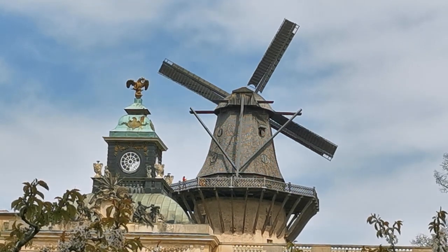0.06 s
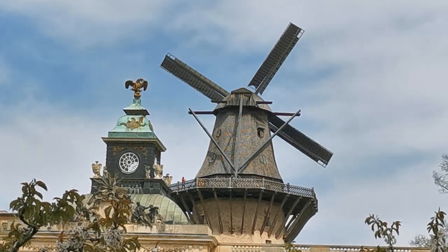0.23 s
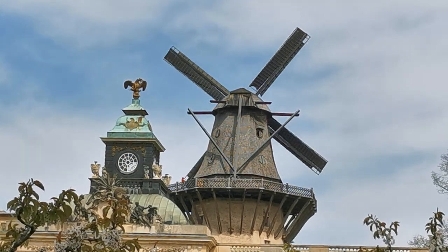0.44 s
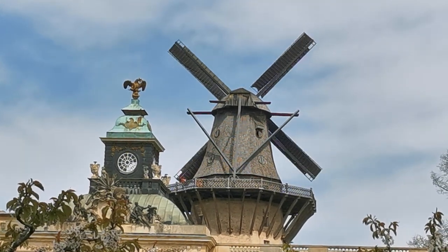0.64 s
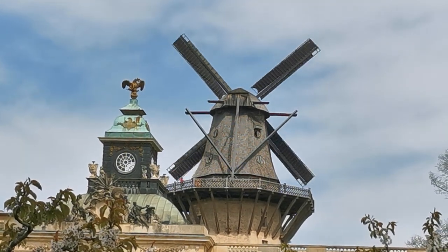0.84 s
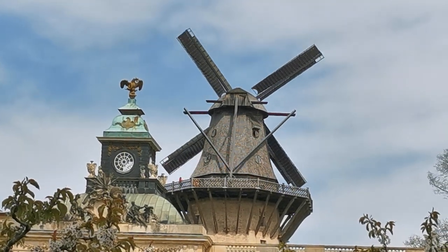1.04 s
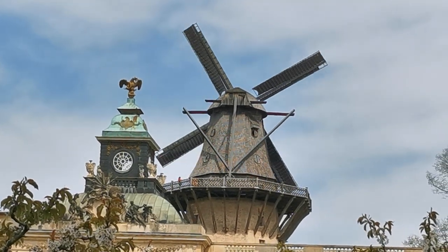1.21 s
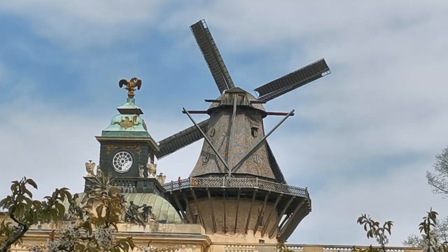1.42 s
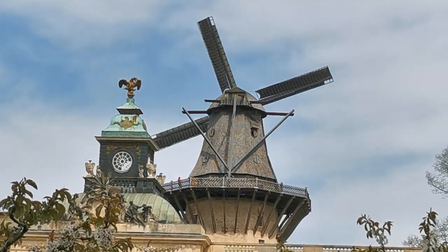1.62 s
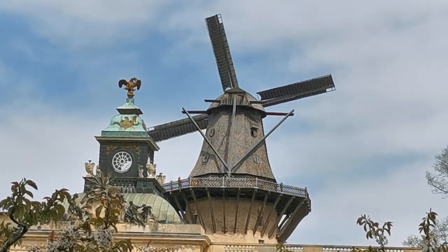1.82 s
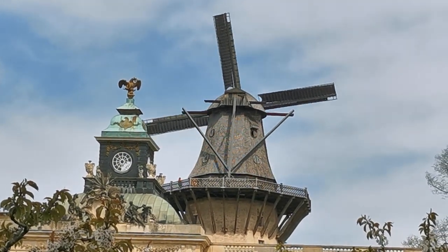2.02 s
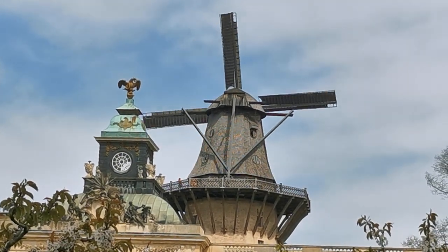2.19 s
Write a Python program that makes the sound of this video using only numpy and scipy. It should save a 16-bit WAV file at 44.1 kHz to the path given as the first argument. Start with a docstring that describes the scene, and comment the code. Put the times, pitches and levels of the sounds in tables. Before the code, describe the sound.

Birds sing among park trees: a near one twitters, trills and buzzes very high, while others whistle lower and farther off, growing busier. Light wind buffets the microphone with a low rumble, mostly on the left.

```python
"""Among park trees, a near bird twitters, trills and buzzes very high; others tick, chirp and
whistle lower and farther off. Each note is a gliding tone from a bird's syrinx, modulated in the
buzzes and trills, and the trees scatter every note into an echo. Eddies of a light wind buffet the
microphone, mostly its left port, over a brief soft scuff and a faint outdoor hush."""
import sys
import numpy as np
from scipy import signal
from scipy.fft import rfft, irfft, next_fast_len
from scipy.io import wavfile
from scipy.ndimage import uniform_filter1d, map_coordinates

SR = 44100
rng = np.random.default_rng(int(sys.argv[2]) if len(sys.argv) > 2 else 0)


def file_out(sig):
    """Save sig as 16-bit WAV at sys.argv[1]."""
    # one column per channel
    cols = np.atleast_2d(sig).T
    # limit, then scale
    lim = np.clip(cols, -1, 1)
    pcm = np.round(lim * 32767).astype(np.int16)
    wavfile.write(sys.argv[1], SR, pcm)


N = 103635
NEAR_WET_DB, NEAR_T60_S, FAR_T60_S = -6.5, 0.36, 1.45  # echo of the trees


def near_bird():
    """Superposition of the direct song, a few close reflections and the echo of the trees."""
    port_lag_s = 3.6e-5  # the song reaches the right port a moment later
    song = chirps() + buzzes() + trills()
    direct = np.array([song[0], map_coordinates(song[1], [np.arange(N) - port_lag_s * SR])])
    early = amp(-1) * reflections(song, spread_s=0.005)
    return direct + early + amp(NEAR_WET_DB) * trees(song, NEAR_T60_S, build_s=0.0022)


def syrinx(hz, level_db, edge=0.36, rough=0.013):
    """Self-sustained oscillation: an unsteady pure tone; edge is the share spent rising, and falling."""
    n = len(hz)
    u = np.linspace(0, 1, n)
    envelope = np.sin(np.pi / 2 * np.clip(np.minimum(u, 1 - u) / edge, 0, 1))
    jitter = 1 + 0.0062 * wobble(248.4, n) + rough * wobble(692.3, n)
    phase = 2 * np.pi * np.cumsum(hz * jitter) / SR
    return np.sqrt(2) * envelope * amp(level_db + 2.15 * wobble(136.8, n)) * np.sin(phase)


def chirps():
    """Frequency glides: each of the near bird's quick notes bends through three pitches."""
    # chirps: t/s, length/s, first f/Hz, middle f/Hz, last f/Hz, level/dB
    notes = [(0.38, 0.013, 6960, 7160, 6300, -67.5), (0.418, 0.016, 6880, 6730, 5500, -63.5),
             (0.445, 0.023, 6750, 6610, 5440, -66), (0.487, 0.017, 6840, 6390, 5900, -60.5),
             (0.523, 0.016, 6500, 6350, 5470, -64), (0.845, 0.046, 6710, 7540, 6570, -61),
             (0.905, 0.0236, 9300, 8000, 7540, -60.5), (0.954, 0.012, 6130, 6750, 6300, -65.5),
             (1.058, 0.035, 6750, 7480, 6600, -63.5), (1.122, 0.018, 8270, 6690, 6200, -60),
             (1.145, 0.021, 5430, 5800, 5450, -60.5), (1.212, 0.038, 6670, 7400, 7630, -62),
             (1.335, 0.022, 8130, 8360, 9400, -64.5), (1.368, 0.04, 6090, 5940, 5620, -55),
             (1.49, 0.04, 9200, 8450, 8070, -61.5), (1.784, 0.022, 8460, 7790, 6500, -56),
             (1.825, 0.0407, 6125, 6375, 6480, -47), (1.905, 0.032, 5820, 5275, 5250, -60.5),
             (1.962, 0.019, 8900, 8930, 7840, -67.5), (1.988, 0.011, 6770, 6460, 5350, -55),
             (2.008, 0.018, 7280, 6900, 6030, -56.5), (2.033, 0.017, 7410, 6750, 6020, -52),
             (2.05, 0.018, 7650, 8420, 8150, -63), (2.118, 0.036, 7900, 6880, 5950, -48.5),
             (2.18, 0.056, 7670, 7750, 7140, -59)]
    # their stereo balance: t/s, left-right/dB
    balance = [(.45, 4.5), (.8, -4), (1.1, -1)]
    out = np.zeros((2, N))
    for s, length, *pitches, db in notes:
        _, hz = arc(length, pitches)
        add(out, s, syrinx(hz, db), np.interp(s, *np.transpose(balance)))
    return out


def buzzes():
    """Fast modulation spreads the near bird's tone into sidebands, heard as a buzz."""
    # buzzes: t/s, length/s, first, middle, last f/Hz, level/dB, left-right/dB, flutter/Hz, swing/Hz
    notes = [(1.002, 0.061, 7600, 8650, 9060, -68, -11, 170, 554),
             (1.074, 0.021, 6900, 6630, 6200, -59.5, 13, 150, 870),
             (1.272, 0.042, 5900, 6280, 6030, -67.5, 7, 140, 1010),
             (1.384, 0.06, 5900, 6780, 6850, -60, 3, 138, 490),
             (1.409, .05, 7500, 8600, 8850, -66.5, -5, 138, 430),
             (1.824, 0.083, 6400, 6860, 6370, -56.5, -1, 190, 860)]
    out = np.zeros((2, N))
    for s, length, *pitches, db, pan, rate, swing in notes:
        add(out, s, flutter(length, pitches, db, rate, swing, rough=0.013), pan)
    return out


def flutter(length, pitches, db, rate, swing, rough, depth_db=8):
    """Frequency and amplitude modulation of one note at a common rate."""
    t, hz = arc(length, pitches)
    turn = 2 * np.pi * rate * t
    return syrinx(hz + swing * np.sin(turn), db - depth_db * np.cos(turn), rough=rough)


def trills(dip_db=14.5):
    """Sawtooth frequency modulation: repeated sweeps, parted into syllables by dips in level."""
    # trills: t/s, length/s, f/Hz, syllable rate/Hz, sweep/Hz, level/dB, swell/dB, left-right/dB
    notes = [(0.57, 0.227, 7390, 56.7, -650, -57.5, 10, -9), (1.527, 0.213, 6450, 43, 531, -47.5, 3, 7),
             (2.217, 0.066, 6950, 63, -750, -54, 8, 2)]
    out = np.zeros((2, N))
    for s, length, hz, rate, sweep, db, swell, pan in notes:
        t = np.arange(int(length * SR)) / SR
        turn = 2 * np.pi * rate * t
        level = db + swell * (t / length - .5) - dip_db * ((1 + np.cos(turn)) / 2) ** 2
        pitch = hz + sweep / 2 * signal.sawtooth(turn, width=0.8)
        add(out, s, syrinx(pitch, level, edge=0.088, rough=0.009), pan)
    return out


def far_birds():
    """Reverberation: distant fluted whistles and raspy burrs linger among the trees."""
    # whistles: t/s, length/s, first f/Hz, middle f/Hz, last f/Hz, level/dB, left-right/dB
    whistles = [(0, 0.047, 3920, 3440, 3300, -76.5, -1), (0.293, 0.027, 4080, 4050, 3830, -73, 4),
                (0.518, 0.042, 2840, 3046, 3170, -68.5, -23), (0.601, 0.059, 3220, 3320, 3540, -65, -16),
                (0.738, 0.091, 3870, 3864, 3640, -65, -0.5), (0.775, 0.023, 4560, 4190, 4160, -60.5, 7),
                (0.833, 0.024, 4520, 4100, 3850, -64, -7), (0.921, 0.045, 4050, 3980, 4110, -64.5, 4),
                (0.972, 0.03, 2660, 2490, 2400, -66, 23), (0.978, 0.051, 4830, 4200, 4120, -58.5, -3),
                (1.01, 0.058, 4074, 4166, 4390, -58.5, 0.5), (1.135, 0.12, 3806, 3338, 3316, -61, -6),
                (1.223, 0.072, 1840, 1763, 1814, -69, 11), (1.351, 0.058, 4010, 3650, 3735, -59.5, -3),
                (1.395, 0.046, 3680, 3240, 2720, -59, -27), (1.361, 0.084, 2100, 2214, 2220, -54, 7),
                (1.501, 0.037, 2112, 2255, 2100, -51.5, 10), (1.557, 0.029, 3903, 3420, 2890, -58.5, -7.5),
                (1.697, 0.09, 1976, 1989, 1853, -56, 6), (1.768, 0.129, 1933, 1723, 1706, -61, 11),
                (1.726, 0.088, 2333, 2462, 2437, -61, -8), (1.787, 0.08, 2515, 3024, 2963, -59, -11),
                (1.953, 0.12, 2387, 2648, 2446, -57, -8.5), (1.976, 0.058, 4400, 4520, 4584, -63.5, 1),
                (2.036, 0.06, 3010, 3064, 3370, -62.5, -5), (2.096, 0.073, 4460, 4420, 4320, -65.5, 8),
                (2.115, 0.095, 1934, 2207, 1835, -49.5, 8.5), (2.264, 0.062, 3900, 3470, 3000, -61.5, -7)]
    # burrs: t/s, length/s, first, middle, last f/Hz, level/dB, left-right/dB, flutter/Hz, swing/Hz
    burrs = [(1.42, 0.0668, 2596, 2529, 2357, -60, 12, 72, 282),
             (2.042, 0.053, 2277, 2177, 2080, -56.5, 9, 75, 199)]
    out = np.zeros((2, N))
    for s, length, *pitches, db, pan in whistles:
        _, hz = arc(length, pitches)
        add(out, s, syrinx(hz, db, edge=0.3, rough=0.004), pan)
    for s, length, *pitches, db, pan, rate, swing in burrs:
        add(out, s, flutter(length, pitches, db, rate, swing, rough=0.06), pan)
    return out + amp(-0.5) * trees(out, FAR_T60_S, build_s=0.0022)


def flock(count=40, start_s=0.88, length_s=0.025, low_hz=5240, high_hz=8140):
    """Indirect sound: faint random chirps arrive only by reflection from trunks and as diffuse echo."""
    out = np.zeros((2, N))
    for k, (when, pitch, glide, side) in enumerate(rng.random((count, 4))):
        s = start_s + (N / SR - start_s) * (k + when) / count
        hz = low_hz * (high_hz / low_hz) ** pitch
        slide = 1 + 0.1142 * np.sign(glide - .5) * np.linspace(-1, 1, int(length_s * SR))
        add(out, s, syrinx(hz * slide, level_db=-67.5), pan_db=10 * (side - .5))
    return reflections(out, spread_s=0.024) + trees(out, FAR_T60_S, build_s=0.004)


def ticks(count=7, start_s=0.019, gap_s=0.054, length_s=0.02, base_hz=5340):
    """Linear upward sweeps, brief enough to be heard as ticks: a farther bird's even run."""
    out = np.zeros((2, N))
    ramp = np.linspace(-1, 1, int(length_s * SR))
    for k in range(count):
        hz = base_hz * (1 + 0.16 * (ramp + rng.uniform(-.5, 0.17)))
        add(out, start_s + k * gap_s, syrinx(hz, level_db=-75), pan_db=16)
    return out + amp(NEAR_WET_DB) * trees(out, NEAR_T60_S, build_s=0.0084)


def reflections(x, spread_s, count=8):
    """Early reflections: a few delayed copies, different in each ear."""
    taps = np.zeros((2, SR // 10))
    for ear in taps:
        signs = rng.choice([-1, 1], count)
        delays = (spread_s * SR * rng.random(count)).astype(int)
        ear[delays] = signs / np.sqrt(count)
    return signal.fftconvolve(x, taps, axes=1)[:, :N]


def trees(x, t60, build_s):
    """Multiple scattering: a diffuse echo builds up and decays exponentially, different in each ear."""
    t = np.arange(SR) / SR
    tail = rng.standard_normal((2, SR)) * amp(-60 * t / t60) * (1 - np.exp(-t / build_s))
    tail /= np.linalg.norm(tail, axis=1, keepdims=True)
    return signal.fftconvolve((x + x.mean(0)) / 2, tail, axes=1)[:, :N]


def wind(calm_db=-55, eddy_growth=1.536):
    """Turbulent pressure buffets the left port; the sheltered right one gets only a low rumble."""
    # gusts: t/s, half width/s, level/dB
    gusts = [(0.038, 0.0073, -42), (0.205, 0.0067, -29.5), (0.263, 0.014, -40), (0.422, 0.038, -38),
             (.675, 0.043, -31), (0.768, 0.067, -23.5), (0.86, 0.038, -28.5), (0.946, 0.012, -25),
             (1.021, 0.02, -30.5), (1.173, 0.016, -42), (1.353, 0.021, -36.5), (1.447, 0.0072, -26),
             (1.56, 0.067, -33.5), (1.676, 0.014, -39.5), (1.84, 0.032, -38), (1.953, 0.018, -39.5),
             (2.053, 0.0065, -33.5), (2.18, 0.032, -47)]
    # single eddies hitting the left port: t/s, width/s, peak level/dB
    puffs = [(0.7474, 0.00089, -16.5), (0.8008, 0.00059, -15), (.807, 0.0012, -16.5),
             (1.441, 0.0029, -26.5)]
    # spectra of the rumble, the fine eddies and the sheltered port: f/Hz, relative level/dB
    rumble = [(12, 3.5), (25, -8.5), (75, 3), (120, -1), (200, -14.5), (350, -49), (700, -82)]
    eddies = [(60, -21), (130, 7.5), (230, 3), (330, -6.5), (480, -16.5), (700, -26.5), (1100, -41.5),
              (2500, -99.5)]
    lee = [(20, 5), (40, 14.5), (80, 1.5), (160, -19.5), (400, -48), (900, -112)]
    t = np.arange(N) / SR
    power = sum(amp(db) ** 2 * np.exp(-((t - s) / width) ** 2 / 2) for s, width, db in gusts)
    force_db = 10 * np.log10(amp(calm_db) ** 2 + power)
    left = amp(force_db - 2) * steady(noise(rumble))
    eddy_db = eddy_growth * force_db + 4 + 2.5 * wobble(59.6, N)  # outgrows the rumble: gusts brighten
    left += amp(eddy_db) * steady(noise(eddies))
    for s, width, db in puffs:
        u = (t - s) / width
        left += amp(db) * (1 - u ** 2 / 2) * np.exp(-u ** 2 / 2)
    lee_db = -42.5 + 0.32 * (force_db - force_db.mean()) + 3 * wobble(18.0, N)
    return np.array([left, amp(lee_db) * steady(noise(lee))])


def rustle():
    """Noise under two Gaussian envelopes, heard as a soft double scuff."""
    # scuffs: t/s, width/s, level/dB
    scuffs = [(0.602, 0.0045, -61.5), (0.623, 0.0065, -59)]
    # their spectrum: f/Hz, relative level/dB
    spectrum = [(300, -5), (900, 4.5), (1500, -4.5), (2400, 5), (3500, -4.5), (6000, -34.5)]
    t = np.arange(N) / SR
    envelope = sum(amp(db) * np.exp(-((t - s) / width) ** 2 / 2) for s, width, db in scuffs)
    return envelope * np.array([noise(spectrum), noise(spectrum)])


def hush():
    """Low coherence between the ears makes the faint outdoor background sound wide."""
    # background spectrum: f/Hz, relative level/dB
    spectrum = [(600, 1), (1300, -4.5), (1700, -6.5), (2450, -3.5), (2950, -10), (6000, -7.5),
                (8000, -21.5), (15500, -17.5)]
    # its slow rise: t/s, gain/dB
    rise = [(.55, -66), (1.0, -63.5), (2.35, -62.5)]
    gain = amp(np.interp(np.arange(N) / SR, *np.transpose(rise)))
    separate = np.array([noise(spectrum), noise(spectrum)])
    return gain * (0.65 * separate + 0.21 * noise(spectrum))


def amp(db):
    """Decibels to amplitude ratio."""
    return 10 ** (np.asarray(db) / 20)


def arc(length, pitches):
    """Times and a parabolic glide through the first, middle and last pitch."""
    t = np.arange(int(length * SR)) / SR
    return t, np.polyval(np.polyfit([0, .5, 1], pitches, 2), t / length)


def wobble(rate, size):
    """A smooth random curve, rate knots a second."""
    return map_coordinates(rng.standard_normal(2000), [np.arange(size) * rate / SR + 2], mode="mirror")


def noise(spectrum):
    """Spectral shaping: noise of rms 1 coloured by rows of f/Hz, level/dB."""
    m = next_fast_len(N + 8192)
    f, db = np.transpose(spectrum)
    gain = amp(np.interp(np.log(np.fft.rfftfreq(m, 1 / SR) + 1), np.log(f + 1), db))
    x = irfft(rfft(rng.standard_normal(m)) * gain, m)[:N]
    return x / x.std()


def steady(x):
    """Division by the running rms evens out a noise's slow swells."""
    return x / np.sqrt(np.abs(uniform_filter1d(x ** 2, size=1500)) + 0.051)


def add(out, s, x, pan_db):
    """Constant-power panning places a sound in the stereo field at time s."""
    i = max(round(s * SR), 0)
    x = x[:max(N - i, 0)]
    gain = amp([[pan_db / 2], [-pan_db / 2]])
    out[:, i:i + len(x)] += x * gain / np.sqrt(np.mean(gain ** 2))


def scene():
    """Superposition: the pressures of all sources add at the microphone."""
    return near_bird() + ticks() + flock() + far_birds() + wind() + rustle() + hush()


def record(dry, top_hz=15720):
    """Band limiting: an ideal low-pass keeps nothing above top_hz."""
    m = next_fast_len(N + 8192)
    return irfft(rfft(dry, m) * (np.fft.rfftfreq(m, 1 / SR) < top_hz), m)[:, :N]


dry = scene()
out = record(dry)
file_out(out)
```